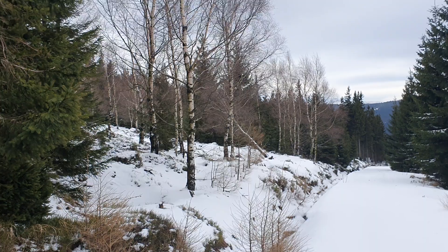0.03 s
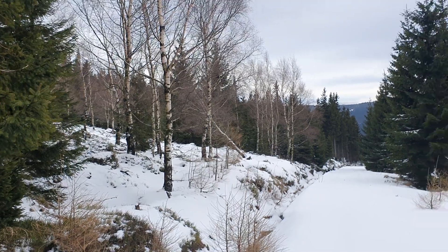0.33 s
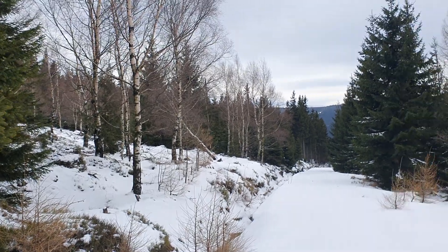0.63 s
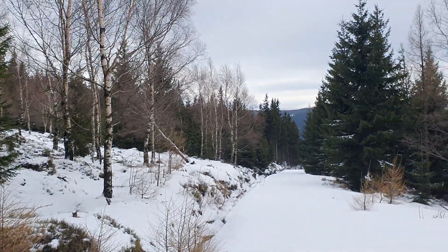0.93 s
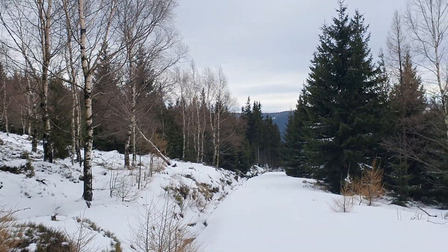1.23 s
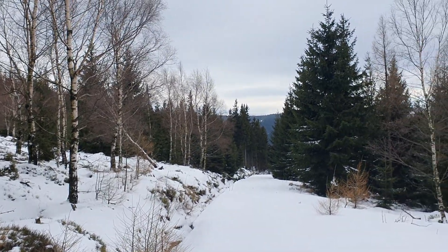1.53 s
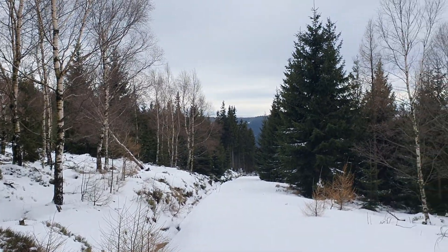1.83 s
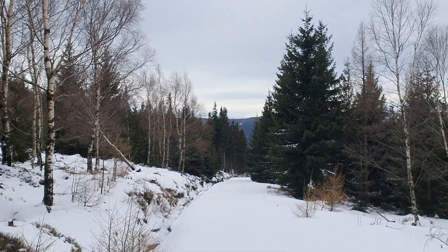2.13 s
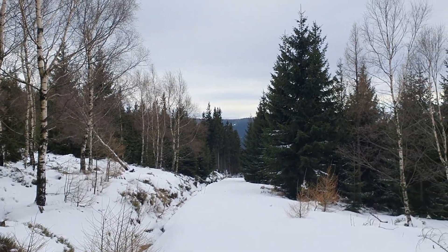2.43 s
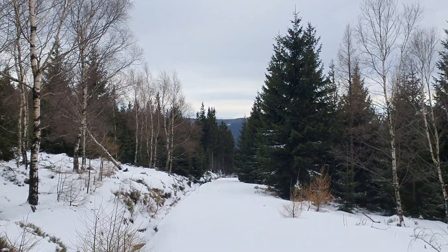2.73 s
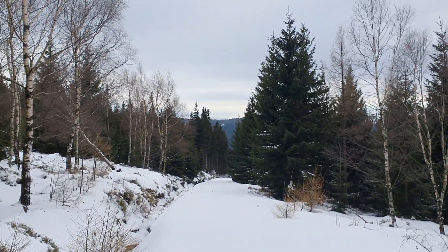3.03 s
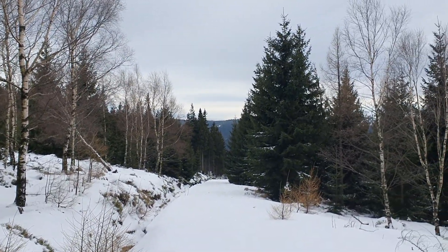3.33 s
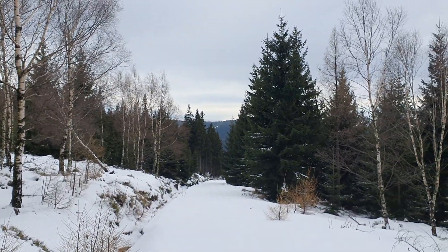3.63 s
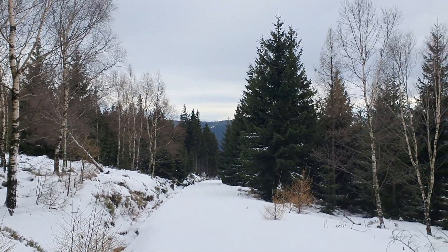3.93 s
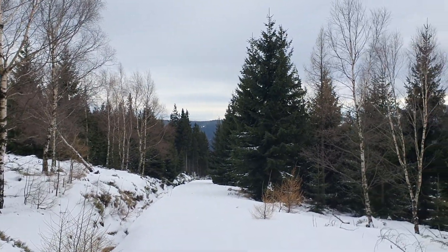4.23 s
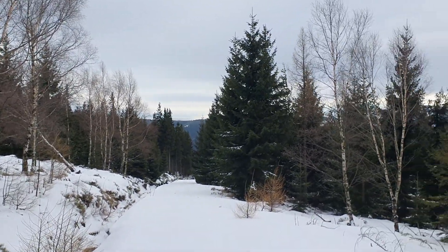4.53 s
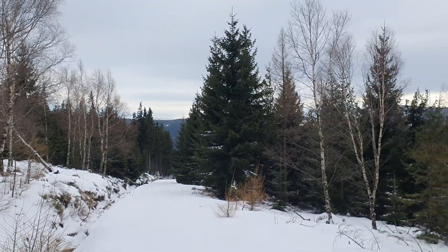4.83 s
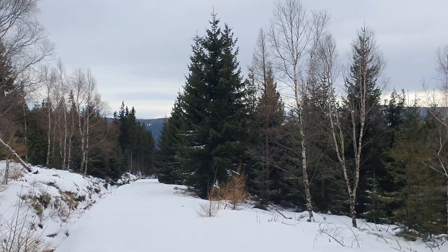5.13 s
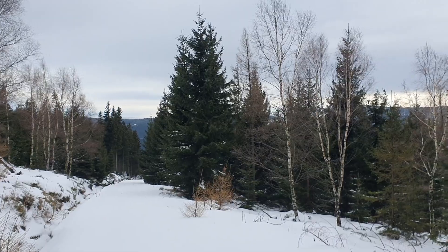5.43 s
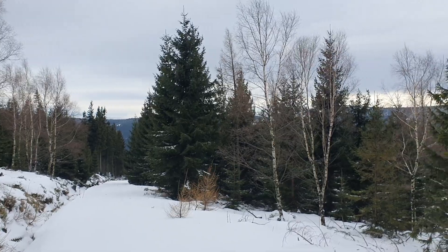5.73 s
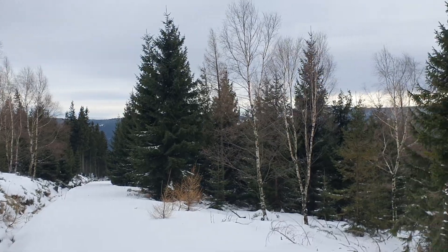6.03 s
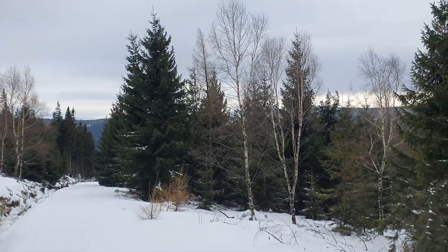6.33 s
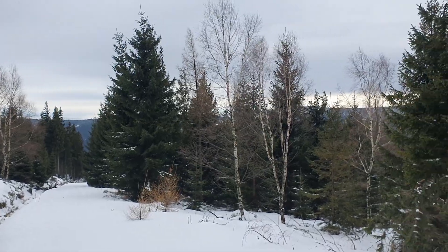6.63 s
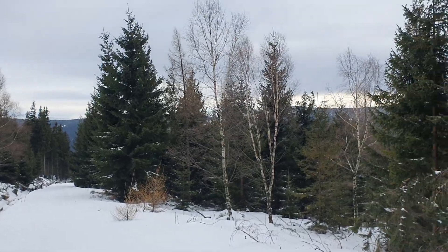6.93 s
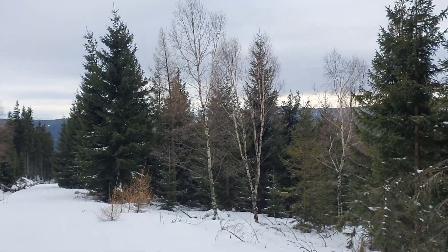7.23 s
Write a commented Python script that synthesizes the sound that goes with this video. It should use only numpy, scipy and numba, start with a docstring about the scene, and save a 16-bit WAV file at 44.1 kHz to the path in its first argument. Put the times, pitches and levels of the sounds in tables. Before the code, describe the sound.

Strong wind rushes without a break through an open snowy forest, heard from a handheld microphone. Branches roar, bare twigs rush and spruce needles hiss all around. The wind starts fairly soft, with light rumble and a few low bumps on the microphone, then builds to full strength by about 2 seconds. The nearest trees surge and give a faint, airy whistle, somewhat to the right at first and more weakly to the left after 5 seconds. From about 1 to 4.5 seconds, gusts tumble over the microphone as an uneven, fluttering rumble with short hard buffets, thickest around 3 to 3.5 seconds and with another hit near 4.3. The rumble then eases while the treetops keep rushing, peaking slightly around 6.4 seconds. A smaller gust rumbles near 7 seconds, and the wind carries on to the end.

```python
"""Snowy forest in strong wind, heard by a handheld phone turning slowly on a track.
Crowns all round roar, bare twigs rush and spruce needles hiss as they shed vortices;
the nearest trees surge and whistle softly to one side. Gusts reach the ground, stir nearby twigs
and tumble over the two microphone ports as an uneven rumble with single hard buffets."""
import sys
import numpy as np
from scipy import signal
from scipy.fft import rfft, irfft, next_fast_len
from scipy.io import wavfile
from scipy.ndimage import uniform_filter1d
from numba import njit

SR = 44100
rng = np.random.default_rng(int(sys.argv[2]) if len(sys.argv) > 2 else 0)


def store_pcm(level_fs):
    """Save levels as 16-bit WAV."""
    pcm = np.round(np.clip(level_fs, -1, 1) * 32767).astype(np.int16)
    wavfile.write(sys.argv[1], SR, np.atleast_2d(pcm).T)


N = 325017
TIME = np.arange(N) / SR
FFT_SIZE = next_fast_len(N)
FREQS = np.arange(FFT_SIZE // 2 + 1) * SR / FFT_SIZE

# treetop wind: time_s, rush_db, roar_db, hiss_db
TREETOP_WIND = [(0.1, -56.5, -46, -71.5), (0.55, -54.5, -48.5, -65), (0.8, -51.5, -46.5, -67),
                (1.3, -51.5, -48.5, -64.5), (1.5, -46.5, -43.5, -61), (1.72, -46.5, -43.5, -59.5),
                (1.82, -45, -42.5, -58), (1.95, -42.5, -39.5, -56.5), (2.25, -42.5, -39.5, -57.5),
                (2.7, -42.5, -41, -57), (2.86, -43.5, -43, -57.5), (3.05, -42, -40.5, -57.5),
                (3.35, -43.5, -41, -58), (3.58, -46.5, -43.5, -60), (3.85, -45.5, -41.5, -61),
                (4.05, -42, -40.5, -58.5), (4.35, -45.5, -41, -60.5), (4.7, -43, -38.5, -58.5),
                (4.9, -45, -43, -58.5), (5.12, -44, -38.5, -58.5), (5.6, -44, -39.5, -58.5),
                (6.05, -41, -37.5, -56.5), (6.4, -39.5, -36.5, -56), (6.72, -41.5, -38, -57),
                (7.05, -42, -38, -57), (7.36, -40, -38, -57)]
# nearest trees: start_s, end_s, left_lag_ms, level_db, whistle_hz, whistle_re_twigs_db
NEAR_TREES = [(-.5, 1.65, 0.44, -5.5, 2400, -12), (1.6, 3.45, 0.35, -3, 3220, -12),
              (3.45, 4.75, 0.36, -2, 2610, -17), (4.9, 7.8, -0.2, -9.5, 2410, -14),
              (5.5, 6.9, -0.34, -13, 1230, -6), (5.95, 6.7, -0.28, -18, 2450, -8)]
# spectrum of small eddies at the ports: freq_hz, gain_db
FLUTTER_SPECTRUM = [(60, -15.5), (140, 3.5), (240, -0.5), (380, -9), (620, -19.5), (1500, -73)]


def forest(air, strong_db=-58, fine_growth=4.9, stir_db=-22, quiver_db=1.5):
    """Branches roar, twigs rush, needles hiss: the thinner the obstacle, the higher its sound."""
    # spectra, thick branches to finest needle hiss: freq_hz, gain_db
    roar_spectrum = [(100, -3.5), (250, 1), (420, 5), (700, 2), (950, 2), (1520, 4), (2050, -2.5),
                     (3000, -7), (6000, -26)]
    rush_spectrum = [(600, -30), (1400, -7.5), (2000, 0.5), (2500, 0), (3100, -7.5), (4100, -7.5),
                     (5000, -19), (6500, -23), (9000, -58)]
    shrill_spectrum = [(2200, -24), (2900, 3), (3400, 9), (4100, -2), (4900, -2), (5800, -8.5), (8000, -38)]
    hiss_spectrum = [(3000, -21), (5000, -0.5), (6300, 2.5), (7500, -1.5), (9000, -0.5), (11500, -11),
                     (12800, -14), (13500, -26), (15500, -33)]
    fine_spectrum = [(8000, -10.5), (12000, -6.5), (13500, -11.5), (15500, -17)]
    # surges through the crowns: peak_s, length_s, rise_db
    surges = [(0.543, 0.1, 3), (1.046, 0.13, -0.5), (1.46, 0.14, 0.6), (1.67, .07, 2), (1.815, 0.072, 3),
              (2.15, 0.11, 1), (2.54, 0.073, 1.5), (2.734, 0.093, 1.6), (3.099, .1, 1.5), (3.29, 0.047, 3),
              (3.417, .08, 2.5), (3.683, 0.094, 2.5), (4.04, .1, -0.5), (6.1, 0.08, 0.5), (6.59, 0.24, .7),
              (7.265, .1, 0.5)]
    rush_db, roar_db, hiss_db = curves(TREETOP_WIND)
    near_power = near_tree_power()
    # light twigs follow a surge in full, branches and needles in part
    surge_db = sum(db * gust_shape(peak_s, length_s) for peak_s, length_s, db in surges)
    twig_db = rush_db + surge_db
    # near trees quiver; the far forest evens out
    quiver = undb(quiver_db * near_power * walk(rate_hz=85))
    stirred = air.mean(axis=0) * undb(stir_db)
    roar = foliage(roar_spectrum) * np.hypot(undb(roar_db + 0.75 * surge_db - 0.19), stirred)
    rush = foliage(rush_spectrum) * np.hypot(undb(twig_db - 1.13), stirred)
    shrill = foliage(shrill_spectrum) * near_power * undb(twig_db - 5.0)
    hiss = foliage(hiss_spectrum, near_db=-9) * undb(hiss_db + 0.32 * surge_db + 0.3)
    # faster air sheds faster vortices: the finest hiss needs the strongest wind
    fine_db = strong_db + fine_growth * (hiss_db - strong_db)
    fine = unit(colour(horizon(), fine_spectrum)) * undb(fine_db - 11.5)
    return sway(roar + rush + shrill + whistles(twig_db)) * quiver + hiss + fine


def foliage(spectrum, near_db=0):
    """Vortices off countless branches of one thickness; far and near trees share a steady level."""
    mix = horizon() + undb(near_db) * near_trees()
    power = 1 + undb(near_db) ** 2 * near_tree_power()
    return unit(colour(mix / np.sqrt(power), spectrum))


def horizon(port_spacing_ms=0.422):
    """Noise from all round: each bearing has its own delay between the ports."""
    delays_s = port_spacing_ms / 1000 * np.cos(np.pi * (np.arange(24) + .5) / 24)
    hz = FREQS[::256]
    coherence = np.interp(FREQS, hz, np.cos(2 * np.pi * np.outer(hz, delays_s)).mean(axis=1))
    mid, side = rfft(rng.standard_normal((2, FFT_SIZE))) * np.sqrt([1 + coherence, 1 - coherence])
    return unit(irfft([mid + side, mid - side], FFT_SIZE)[:, :N])


def near_trees():
    """Each near tree is noise from one bearing."""
    return sum(undb(db) * crossing(start_s, end_s) * bearing(rng.standard_normal(N), lag_ms)
               for start_s, end_s, lag_ms, db, _, _ in NEAR_TREES)


def near_tree_power():
    """Summed power of the near trees."""
    return sum((undb(db) * crossing(start_s, end_s)) ** 2 for start_s, end_s, _, db, _, _ in NEAR_TREES)


def sway(x, depth_db=1.84, rate_hz=90):
    """Branches of each size swing in their own time, so each half octave wavers alone."""
    spectrum, out = rfft(x, FFT_SIZE), 0
    half_octaves = np.clip(2 * np.log2((FREQS + 1) / 250), 0, 9)
    for band in range(10):
        share = np.maximum(1 - np.abs(half_octaves - band), 0)
        out = out + irfft(spectrum * share, FFT_SIZE)[:, :N] * undb(depth_db * walk(rate_hz))
    return out


def airflow(breeze_db=-49):
    """Air speed at each port, as a gain: gusts on a steady breeze."""
    # gusts over the phone: peak_s, length_s, level_db, left_minus_right_db
    gusts = [(0.283, 0.33, -42.5, 18), (0.605, 0.41, -42.5, 11.5), (1, 0.3, -35, -2),
             (1.452, 0.36, -36.5, 5.5), (1.643, 0.16, -32.5, -4), (1.813, 0.12, -33.5, -4),
             (1.942, 0.14, -30.5, -5.5), (2.092, 0.12, -37, -2), (2.352, 0.046, -29, -5.5),
             (2.48, 0.21, -34.5, 1), (2.72, 0.17, -34.5, 0.5), (3.016, 0.3, -31, -2.5),
             (3.18, 0.1, -36, -1), (3.281, 0.11, -28.5, 0.5), (3.405, 0.066, -30.5, 2),
             (3.503, 0.17, -38, -6), (3.68, 0.097, -33, 2), (3.777, 0.09, -39.5, 6), (3.965, 0.36, -42, 7),
             (4.347, 0.095, -29, 0), (4.442, 0.082, -37.5, 12), (4.632, 0.15, -42, 3),
             (4.85, 0.12, -46, -16), (5.055, 0.22, -40.5, -5), (5.28, 0.12, -48, 0),
             (5.864, 0.46, -43.5, -0.5), (6.4, 0.6, -45, -2), (6.765, 0.2, -42.5, 6.5),
             (6.928, 0.19, -37, -3)]
    power = undb(breeze_db) ** 2
    for peak_s, length_s, db, pan_db in gusts:
        port_gains = undb([[db + pan_db / 2], [db - pan_db / 2]])
        power = power + (port_gains * gust_shape(peak_s, length_s)) ** 2
    return np.sqrt(power)


def rumble(air, waver_db=2.5, waver_hz=45, flutter_growth=1.53, strong_db=-32, rush_ref_db=-42):
    """Flow over the phone rumbles; strong wind breaks it into smaller eddies that flutter higher."""
    # spectrum of large eddies: freq_hz, gain_db
    rumble_spectrum = [(15, -7.5), (30, -19), (50, -0.5), (75, 0), (110, -5), (160, -16), (250, -23),
                       (450, -64)]
    flow_db = 20 * np.log10(air) + waver_db * np.array([walk(waver_hz), walk(waver_hz)])
    rush_db = curves(TREETOP_WIND)[0]
    pressure = eddies(patchy_db=5.5, rate_hz=90, shared_gain=0.38)
    flutter_db = strong_db + flutter_growth * (flow_db - strong_db) + 0.58 * (rush_db - rush_ref_db)
    low = even_power(colour(pressure, rumble_spectrum)) * undb(flow_db - 1.0)
    flutter = even_power(colour(pressure, FLUTTER_SPECTRUM)) * undb(flutter_db - 10.5)
    return low + flutter


def buffets(wake_s=0.0094, crossing_s=0.0019, push_db=-3, wake_db=-14):
    """A big eddy: one push between two sucks, in a ragged wake, reaching one port first."""
    # biggest eddies at the ports: time_s, pitch_hz, length_cycles, left_db, right_db
    big_eddies = [(0.077, 99, 0.98, -36, -10.5), (0.228, 83, 0.57, -20, -19), (0.329, 64.7, 0.81, -21, -32),
                  (0.514, 75, 1.3, -21.5, -29), (0.602, 67.6, 0.65, -19, -18), (1.44, 88, 0.65, -12, -14),
                  (1.669, 127, 1.7, -19, -25), (1.799, 74.4, 1.9, -20, -22), (1.826, 79, .8, -27, -28),
                  (1.938, 117, 1.2, -18, -14.5), (2.012, 80, 1.1, -28, -19),
                  (2.363, 89.5, 0.84, -20.5, -21.5), (2.591, 80, 0.45, -25, -16.5),
                  (2.642, 80.5, 0.63, -41, -18), (2.663, 90, 0.53, -30, -30), (2.709, 86, 0.67, -15, -15.5),
                  (2.974, 86, 0.76, -11.5, -11.5), (3.012, 117, 0.62, -14, -14),
                  (3.06, 150, 0.79, -35, -12), (3.11, 125, 0.58, -30, -16), (3.281, 87, 0.74, -18, -17),
                  (3.386, 100, 0.93, -13.5, -16.5), (3.414, 124, 0.59, -19.5, -15),
                  (3.472, 85, 0.65, -22, -38), (3.506, 85.6, 0.56, -44, -20), (3.61, 84.3, 1, -22.5, -45),
                  (3.698, 126, 0.67, -19, -25), (3.757, 75, 0.77, -21.5, -26), (3.904, 79.5, .8, -26, -44),
                  (4.317, 82, 0.47, -28, -16), (4.345, 80.6, 1.2, -15, -19), (4.379, 185, 0.91, -22, -23),
                  (4.422, 110, 0.51, -14.5, -22), (4.8, 75, 0.52, -24, -31), (6.693, 70, 0.79, -28, -24),
                  (6.949, 75.4, 0.52, -27, -22)]
    out = np.zeros((2, N))
    pressure = eddies(patchy_db=7.5, rate_hz=320, shared_gain=0.15)
    wake = unit(colour(pressure, FLUTTER_SPECTRUM)) * undb(wake_db)
    leads_s = crossing_s * rng.choice([-1, 1], len(big_eddies))
    for (time_s, hz, cycles, left_db, right_db), lead_s in zip(big_eddies, leads_s):
        span = np.abs(TIME - time_s) < .05
        t = TIME[span] - time_s + np.array([[lead_s], [-lead_s]]) / 2
        push = undb(push_db) * np.cos(2 * np.pi * hz * t) * np.exp(-(hz * t / cycles) ** 2)
        # small, fast eddies are the most ragged
        ragged = hz / 125 * wake[:, span] * np.exp(-(t / wake_s) ** 2)
        out[:, span] += undb([[left_db], [right_db]]) * (push + ragged)
    return out


def eddies(patchy_db, rate_hz, shared_gain):
    """Eddy pressure comes in lumps; the two ports share little of it."""
    left, right, both = (rng.standard_normal(N) * undb(patchy_db * walk(rate_hz)) for _ in range(3))
    return np.array([left, right]) + shared_gain * both


def whistles(twig_db, width=0.36, octaves_per_db=0.14):
    """Twigs of each near tree shed vortices round one pitch that follows the wind."""
    out = np.zeros((2, N))
    for start_s, end_s, lag_ms, _, hz, db in NEAR_TREES:
        gain = crossing(start_s, end_s)
        octaves = octaves_per_db * (twig_db - np.average(twig_db, weights=gain))
        pitch_hz = hz * 2 ** np.clip(octaves, -1, 1)
        voice = resonate(resonate(rng.standard_normal(N), pitch_hz, width), pitch_hz, width)
        out += undb(twig_db + db) * gain * bearing(unit(voice), lag_ms)
    return out


def gust_shape(peak_s, length_s):
    """Quick rise, hold and drop; length at half height."""
    return .5 ** (np.abs(2 * (TIME - peak_s) / length_s) ** 3)


def crossing(start_s, end_s, fade_s=0.52):
    """Gain of a tree as the wind crosses it."""
    return np.sqrt(np.clip(.5 + np.minimum(TIME - start_s, end_s - TIME) / fade_s, 0, 1))


def bearing(x, lag_ms):
    """Sound from one direction: the left port lags by lag_ms."""
    late = rfft(x, FFT_SIZE) * np.exp(-2j * np.pi * FREQS * lag_ms / 1000)
    return np.array([irfft(late, FFT_SIZE)[:N], x])


def even_power(x, window_s=.07):
    """Eddies follow closely, so a steady flow holds its power; rms 1."""
    size = int(window_s * SR)
    power = uniform_filter1d(uniform_filter1d(x ** 2, size), size)
    return unit(x / np.sqrt(power + 1e-18))


@njit
def resonate(x, hz, width):
    """Band-pass with a moving centre; width is a share of the centre."""
    y, band, low = np.empty(len(x)), 0., 0.
    for i in range(len(x)):
        g = np.tan(np.pi * hz[i] / SR)
        v = (band + g * (x[i] - low)) / (1 + g * (g + width))
        band, low, y[i] = 2 * v - band, low + 2 * g * v, width * v
    return y


def colour(x, spectrum):
    """Filter by freq_hz, gain_db points; steep fall past the last."""
    hz, db = np.transpose(spectrum)
    gain = undb(np.interp(np.log(FREQS + 1), np.log(hz), db)) / np.maximum(FREQS / hz[-1], 1) ** 2
    return irfft(rfft(x, FFT_SIZE) * gain, FFT_SIZE)[..., :N]


def walk(rate_hz):
    """Random steps, smoothed twice; rms 1."""
    hold = max(int(SR / rate_hz), 1)
    steps = np.repeat(rng.standard_normal(N)[:N // hold + 1], hold)
    return unit(uniform_filter1d(uniform_filter1d(steps, hold), hold)[:N])


def curves(table):
    """Columns of a time table, per sample."""
    time_s, *columns = np.transpose(table)
    return [np.interp(TIME, time_s, column) for column in columns]


def undb(db):
    """Decibels to gain."""
    return 10 ** (np.asarray(db) / 20)


def unit(x):
    """Scale to rms 1."""
    return x / np.sqrt(np.mean(x ** 2))


def scene():
    """The forest, plus wind on the microphone."""
    air = airflow()
    return forest(air) + rumble(air) + buffets()


def record(dry, start_s=.069, top_hz=15500):
    """The right port colours the treble; the phone opens after a moment and cuts the top."""
    # duct behind the right port: freq_hz, gain_db
    right_duct = [(6000, 0), (7000, -4), (8000, -2), (9000, 2), (10000, 1), (11000, 6), (12500, 0),
                  (15000, -4)]
    opening = np.clip((TIME - start_s) / .002, 0, 1)
    ports = np.array([dry[0], colour(dry[1], right_duct)]) * opening
    return signal.sosfilt(signal.ellip(10, .2, 80, top_hz, fs=SR, output="sos"), ports)


dry = scene()
out = record(dry)
store_pcm(out)
```